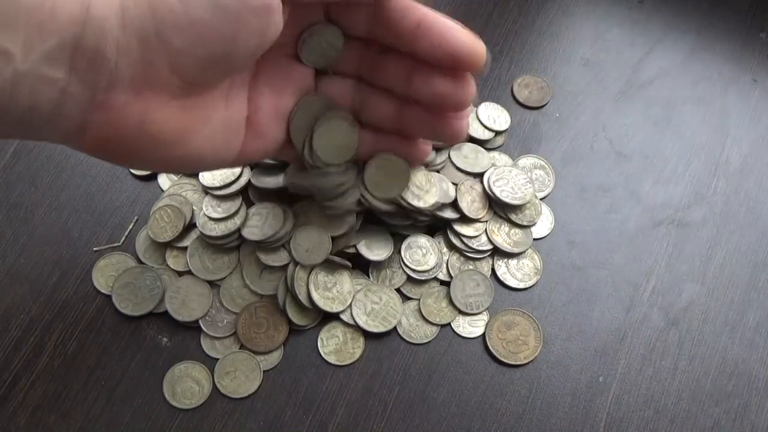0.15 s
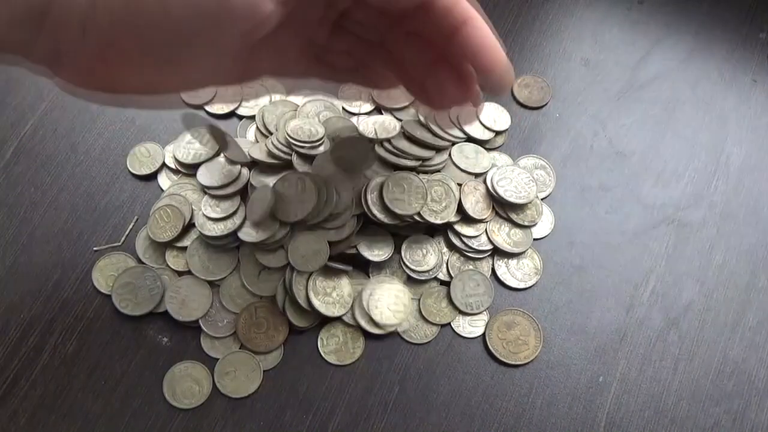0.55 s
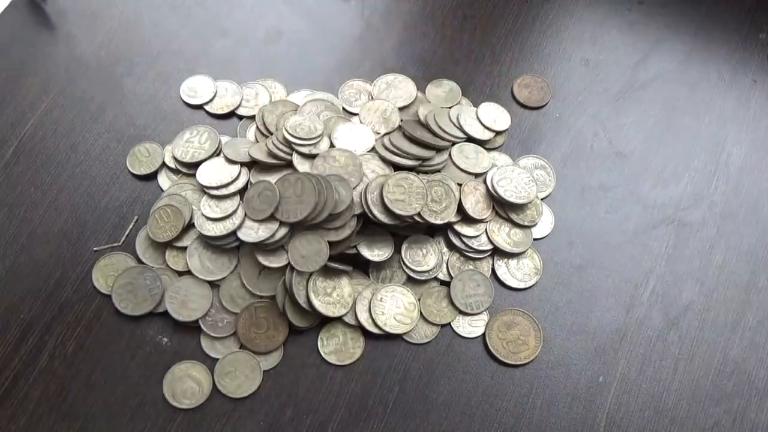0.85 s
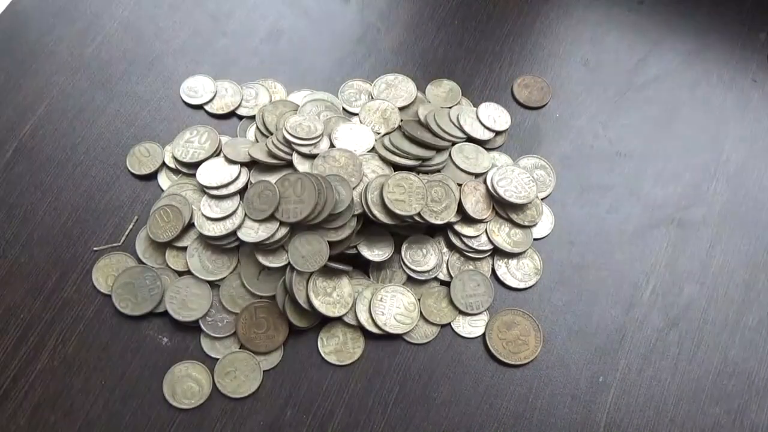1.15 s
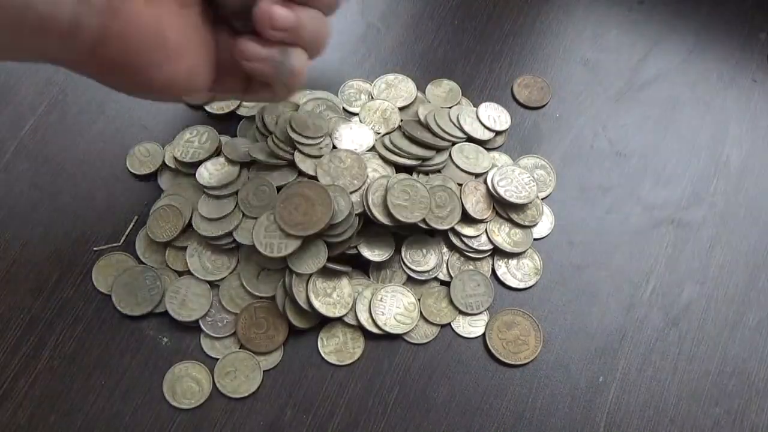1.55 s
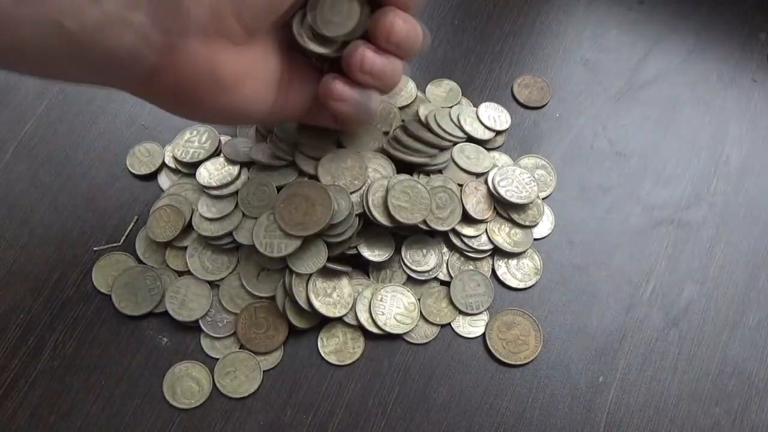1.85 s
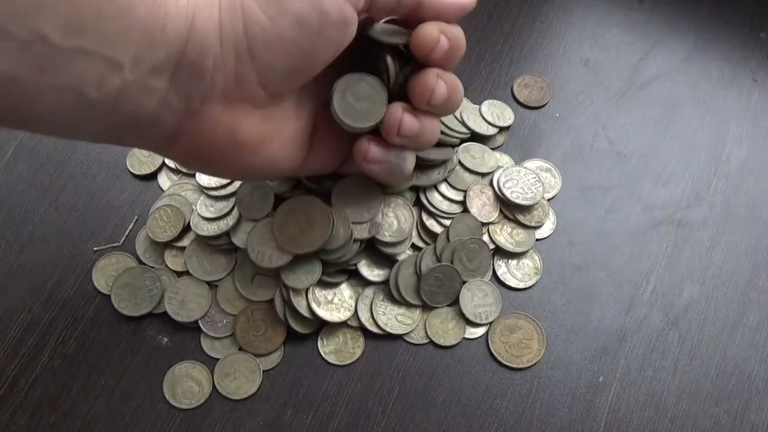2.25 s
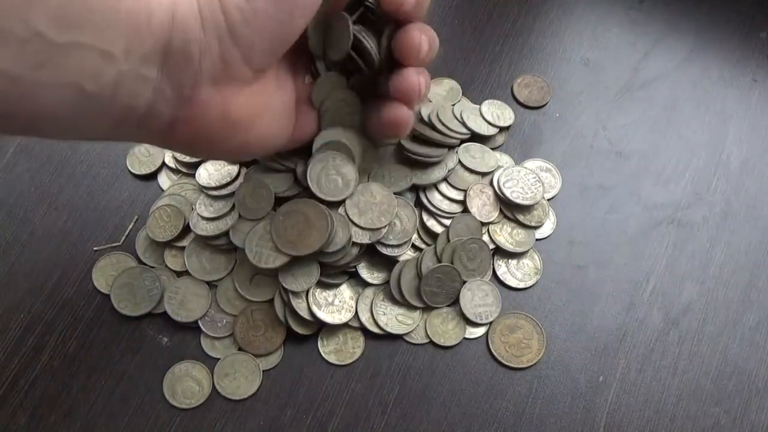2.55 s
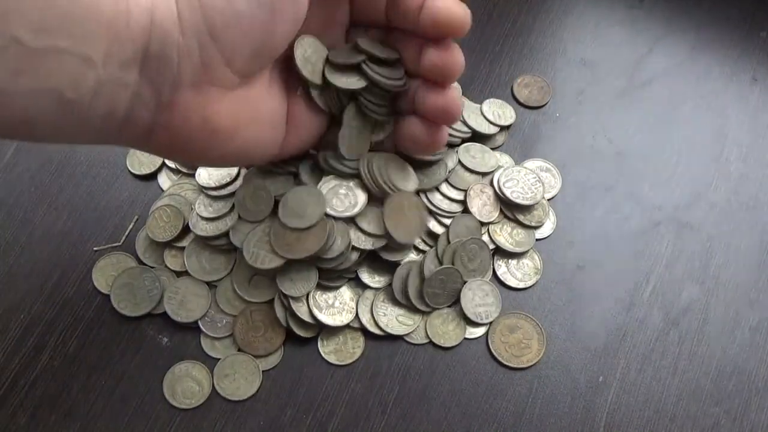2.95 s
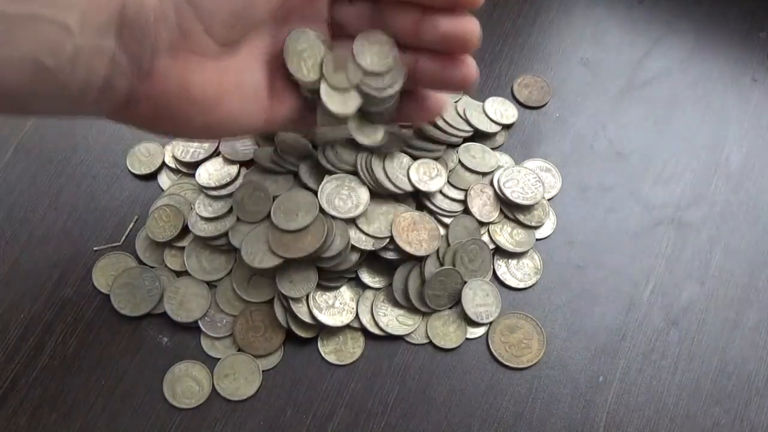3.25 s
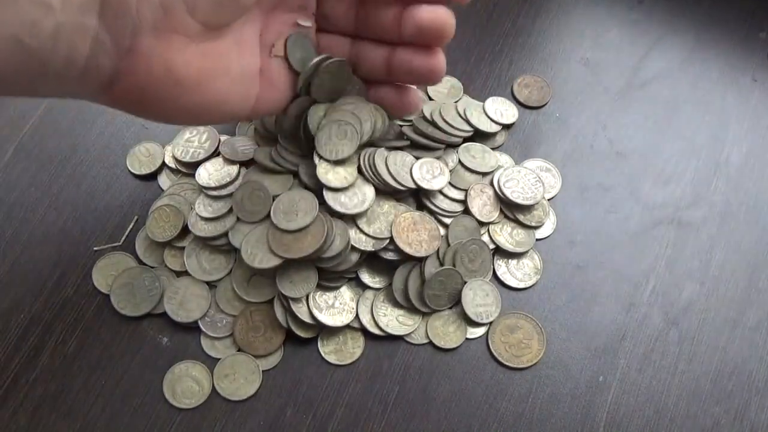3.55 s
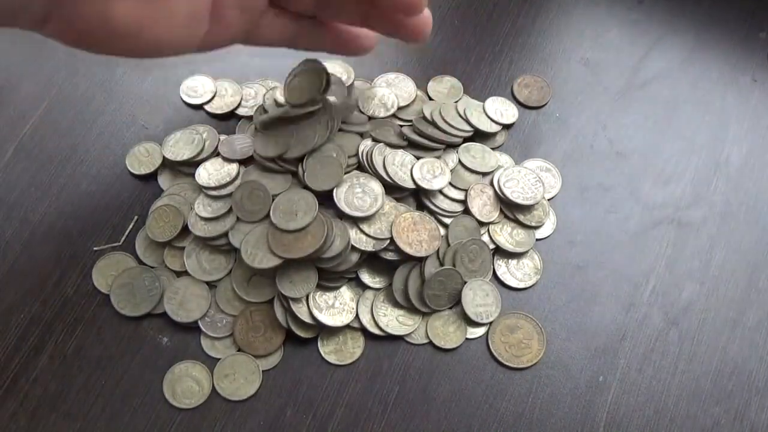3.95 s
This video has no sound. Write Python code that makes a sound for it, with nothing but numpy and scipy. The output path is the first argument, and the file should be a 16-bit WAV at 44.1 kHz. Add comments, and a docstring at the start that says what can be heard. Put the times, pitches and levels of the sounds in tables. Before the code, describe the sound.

Heard close up in a small, quiet room, a handful of coins jingles onto a coin pile, knocking lightly on the wooden table beneath. A loose coin skips away across the wood, an arm swishes, something bumps dully and one late coin lands. Then coins shift in the hand and spill again in several dense, clinking pours over faint room air and hum.

```python
"""Coins slide from a hand onto a heap of coins on a wooden table, close by, with a dull bump.
Each contact clicks, rings a coin and knocks the table. A stray coin bounces and rolls away,
the arm swishes, a late coin slaps on top; then coins shift in the hand and more handfuls pour.
A small room answers; room air and a faint hum lie under it all."""
import sys
import numpy as np
from scipy import signal
from scipy.fft import rfft, irfft, next_fast_len
from scipy.io import wavfile
from scipy.ndimage import uniform_filter1d, minimum_filter1d

SR = 44100
rng = np.random.default_rng(int(sys.argv[2]) if len(sys.argv) > 2 else 0)


def wav_record(signal):
    """Record a signal, one row per channel, as 16-bit PCM in the file named by sys.argv[1]."""
    frames = np.transpose(np.atleast_2d(signal))
    bounded = np.clip(frames, -1, 1)
    # unit amplitude maps onto the largest positive 16-bit level
    quanta = np.round(bounded * 32767).astype(np.int16)
    wavfile.write(sys.argv[1], SR, quanta)


N = 180369
BLOW_TIME_S = np.arange(SR // 8) / SR

# batches leaving the hand (start [s], rise [s], hold [s], fall [s], jingle [dB], clatter [dB])
POURS = [(0, 0.0017, 0.013, .1, -36.5, -39), (0.085, 0.075, 0.006, 0.13, -37, -35.5),
         (0.253, 0.0066, 0.09, 0.13, -27.5, -35.5), (0.34, 0.087, 0.18, 0.12, -22.5, -29.5),
         (1.689, .012, 0.044, 0.12, -35.5, -37.5), (1.845, 0.16, .06, 0.069, -25, -25),
         (2.145, 0.027, 0.024, 0.081, -35, -35), (2.285, .015, 0.056, 0.37, -31.5, -54),
         (2.375, 0.052, 0.014, 0.26, -21, -31), (2.58, 0.013, 0.019, 0.3, -34.5, -33),
         (2.72, 0.042, 0.14, 0.11, -21.5, -40.5), (2.911, 0.012, 0.036, 0.06, -21, -29),
         (3.128, 0.01, 0.0049, 0.07, -33, -41), (3.182, 0.13, .035, 0.082, -18, -33.5),
         (3.517, 0.014, .015, 0.05, -31, -27), (3.574, 0.025, 0.029, .22, -18.5, -29),
         (3.756, 0.081, 0.13, 0.28, -23.5, -30.5), (3.978, 0.011, 0.015, 0.032, -31, -25.5),
         (4.048, 0.013, .045, .07, -23.5, -27)]
# dull bumps (time [s], level [dB], resonance [Hz])
BUMPS = [(0.003, -21, 466), (0.017, -27.5, 414), (0.02, -34, 130), (0.454, -33, 190), (0.950, -7, 1170),
         (0.957, -28, 150), (2.931, -37.5, 189)]
# distinct landings (time [s], level [dB], knock offset [dB])
LANDINGS = [(.0363, -23, -4), (0.0977, -27.5, -0.5), (0.1432, -20.5, -23), (0.176, -14, -19),
            (0.2102, -20.5, -26), (0.2669, -11, -6), (0.3015, -7.5, -27), (0.3275, -14, -4),
            (.39, -13.5, -24), (0.4067, -9, -21), (0.4496, -9, -23), (0.5134, -6, -12), (0.555, -5.5, -11),
            (0.591, -8.5, -15.5), (1.4447, -30.5, -14.5), (1.521, -26.5, -15), (1.7246, -21, -13),
            (1.8175, -25, -1.5), (1.8795, -16, -6.5), (1.9025, -16, -8), (1.973, -9, -13),
            (2.013, -0.5, -27), (2.0281, 6, -19.5), (2.0608, -4, -19), (2.1069, -2, -11.5),
            (2.1628, -15.5, -4), (2.18, -11.5, -5.5), (2.2014, -15.5, -3.5), (2.2862, -16, -38),
            (2.3045, -8, -50), (2.3352, -11.5, -37), (2.4396, -8, -23), (2.518, -11, -11),
            (2.602, -4, -11.5), (2.6549, -9.5, -9.5), (2.6974, -16, -26), (2.711, -11.5, -7),
            (2.754, -7, -26), (2.7662, 1.5, -30), (2.8095, -6.5, -15.5), (2.848, -4.5, -29),
            (2.9093, -14, -24.5), (2.9322, -3, -13), (3.014, -22.5, -17), (3.137, -16, -27),
            (3.188, -12, -50), (3.2352, -9, -42), (3.3148, -10.5, -16), (3.3268, -8.5, -13),
            (3.3455, -11, -11), (3.384, -20, -11), (3.4215, -12, -25), (3.5311, -13.5, -6.5),
            (3.5381, -11.5, -3), (3.5793, -7, -36), (3.6062, -9.5, -12), (3.644, -10, -6.5),
            (3.7221, -7.5, -4.5), (3.792, -13, -3.5), (3.8446, -1.5, -9), (3.875, -12.5, -9),
            (3.907, -5, -18), (3.9459, -8, -12.5), (3.9809, -7, -4.5), (4.0078, -13, -6),
            (4.0463, -8.5, -7.5), (4.0534, -7, -14), (4.0824, -2, -11)]
# flat landings on a stack (time [s], level [dB], pitch [Hz])
FLAT_LANDINGS = [(.1633, -14, 2930), (2.0273, -12, 2340), (2.0604, -3.5, 4810), (2.1076, -4, 4810),
                 (2.162, -14.5, 5070), (2.1804, -7, 2880), (2.2008, -8, 2765), (2.9312, -10, 2520),
                 (3.327, -13, 2900), (3.9804, -6, 3210)]
# coins ringing freely (time [s], pitch [Hz], level [dB])
REBOUNDS = [(.294, 8020, -28.5), (0.392, 8130, -24.5), (.468, 9450, -23.5), (.598, 8980, -16.5),
            (.703, 9216, -23), (2.306, 10260, -28), (2.305, 9900, -22.5), (2.334, 7810, -21),
            (2.518, 9730, -23), (2.758, 9720, -28), (2.784, 6600, -27), (2.863, 10950, -20.5),
            (3.578, 7700, -28), (3.667, 7780, -23), (3.874, 8000, -20), (3.916, 9150, -19.5)]
# arm swishes (start [s], rise [s], hold [s], fall [s], level [dB])
ARM_MOVES = [(0.781, 0.11, 0.12, 0.08, -31.5), (1.06, 0.088, 0.037, 0.16, -44.5),
             (1.362, .13, 0.064, 0.036, -48)]
# late coin's touchdowns (time [s], level [dB])
LATE_TOUCHES = [(1.2753, -23), (1.2857, -10.5), (1.2884, -10.5), (1.296, -25)]
# coins shifting in the hand (start [s], rise [s], hold [s], fall [s], level [dB])
HAND_SHIFTS = [(1.695, .008, 0.2, .15, -43.5), (2.376, 0.057, 0.24, .12, -40.5),
               (3.136, .008, 0.011, 0.031, -36.5)]
# lowest bending mode per kind of coin (frequency [Hz])
COIN_MODES_HZ = [7700, 7800, 7930, 8120, 8840, 9010, 9060, 9172, 9500, 10000, 9820, 10240, 10500, 10790]
# table top modes (frequency [Hz], level [dB], t60 before damping [s])
TABLE_MODES = [(701, -18.5, 0.33), (801, -20, 0.3), (1100, -15.5, 0.19), (1360, -26, 0.08),
               (1569, 2.5, 0.063), (1597, 3.5, 0.061), (1600, -23.5, 0.043), (1790, -7, 0.074),
               (2097, -1.5, 0.039), (2134, -8, 0.17), (2306, 1.5, 0.089), (2620, -10, 0.066),
               (3070, -6, 0.086), (3180, -25, 0.029), (3345, -7, 0.073)]
# hum partials (frequency [Hz], level [dB])
HUM_TONES = [(118.4, -79.5), (199.2, -65.5)]
# room decay (frequency [Hz], t60 [s])
ROOM_DECAY = [(200, 0.44), (1500, 0.2), (5000, 0.21), (11000, 0.034)]
# metal on metal (frequency [Hz], level [dB])
CLICK_SPECTRUM = [(200, -51), (600, -26), (2000, -18), (3500, -10.5), (5000, -2), (6800, -1), (8000, -0.5),
                  (9700, 3.5), (11000, -1.5)]
# blow on the table (frequency [Hz], level [dB])
KNOCK_SPECTRUM = [(50, -50.5), (175, -23.5), (300, -27), (440, -12.5), (780, -3), (1150, -1.5), (1500, 3.5),
                  (1900, -3), (2800, -0.5), (5000, -10.5), (9000, -35.5)]
# soft, heavy push (frequency [Hz], level [dB])
THUD_SPECTRUM = [(60, -19), (150, -10), (310, 3), (480, 1), (700, 0.5), (1250, -4), (2000, -2.5),
                 (3200, -14), (8000, -43)]
# crack of a rim (frequency [Hz], level [dB])
RIM_SPECTRUM = [(1200, -31), (3600, 8.5), (5000, 0), (7000, -8), (11000, -28)]
# rolling rim's weighting of the table's ring (frequency [Hz], gain [dB])
ROLL_SPECTRUM = [(400, -8), (730, 3), (1100, -2), (1650, 1.5), (2300, -7), (3200, 3), (4200, -17),
                 (9000, -25)]
# sleeve swish (frequency [Hz], level [dB])
SLEEVE_SPECTRUM = [(880, -17), (1500, -6), (3310, -7), (4400, -2.5), (5840, -7), (7370, 1), (11000, -9),
                   (14300, -48), (22000, -120)]
# coin face on the heap (frequency [Hz], level [dB])
SLAP_SPECTRUM = [(400, -32), (1500, -21), (2050, -3.5), (2450, -15), (3600, -12), (4500, 0.5), (5200, -9),
                 (7400, 3.5), (9500, -2.5), (11000, -14)]
# hollow of the hand (frequency [Hz], level [dB])
PALM_SPECTRUM = [(300, -29), (650, -11), (900, 0), (1150, -7), (1500, -1.5), (1900, -16), (3000, -20),
                 (9000, -45)]
# room air (frequency [Hz], level [dB])
AIR_SPECTRUM = [(30, 5), (70, -14.5), (140, -6), (190, -3.5), (330, -8), (540, 0), (1000, -4.5),
                (1500, -5.5), (2200, -7.5), (7300, -13), (11000, -20)]


def amp(db):
    """Decibels to gain."""
    return 10 ** (np.asarray(db) / 20)


def unit_rms(x):
    """Scale to rms 1."""
    return x / np.sqrt(np.mean(x ** 2) + 1e-20)


def unit_blow(x):
    """Scale to the energy of 1 ms at full level."""
    return x * np.sqrt(SR / 1000 / np.sum(x ** 2))


def sine(hz):
    """Sine, one blow long."""
    return np.sin(2 * np.pi * hz * BLOW_TIME_S)


def fade(t60_s):
    """Exponential decay, 60 dB in t60_s."""
    return np.exp(-np.log(1000) * BLOW_TIME_S / t60_s)


def swell(time_s, start_s, rise_s, hold_s, fall_s, depth_db=19):
    """Rise, hold and fall of a movement, linear in dB."""
    since_s = time_s - start_s
    below = np.maximum(0, 1 - since_s / rise_s) + np.maximum(0, (since_s - rise_s - hold_s) / fall_s)
    return amp(-depth_db * below)


def curve_at(points, hz):
    """Interpolate over log frequency."""
    knots_hz, values = np.transpose(points)
    return np.interp(np.log(hz + 1), np.log(knots_hz), values)


def colour(x, spectrum, size=2048):
    """Minimum-phase filter with the given spectrum."""
    cepstrum = irfft(np.log(amp(curve_at(spectrum, np.fft.rfftfreq(size, 1 / SR)))))
    cepstrum[1:size // 2] *= 2
    cepstrum[size // 2:] = 0
    kernel = irfft(np.exp(rfft(cepstrum)))
    return signal.fftconvolve(np.atleast_2d(x), kernel[None], axes=1)[:, :x.shape[-1]].reshape(x.shape)


def burst(spectrum, t60_s, tail_db, tail_t60_s):
    """Noise crack with a weaker tail."""
    envelope = fade(t60_s) + amp(tail_db) * fade(tail_t60_s)
    return unit_blow(colour(rng.standard_normal(len(BLOW_TIME_S)) * envelope, spectrum))


def stereo_noise(spectrum, width):
    """Coloured noise, part common, part separate per ear."""
    return unit_rms(colour(rng.standard_normal(N) + width * rng.standard_normal((2, N)), spectrum))


def add(out, time_s, x, spread_db=2.5):
    """Mix in at time_s, randomly panned."""
    start = max(0, round(time_s * SR))
    part = x[:max(0, N - start)]
    out[:, start:start + len(part)] += amp(rng.normal(0, spread_db) * np.array([[1], [-1]])) * part


def room_air():
    """Faint, steady air noise."""
    return amp(-53) * stereo_noise(AIR_SPECTRUM, width=0.51)


def hum():
    """Two steady low tones."""
    time_s = np.arange(N) / SR
    return sum(amp(db) * np.sqrt(2) * np.sin(2 * np.pi * (hz * time_s + rng.random()))
               for hz, db in HUM_TONES)


def coin_ring(hz, t60_s, twin_gain=0.41):
    """Struck disc: the bending mode splits into a beating pair."""
    split_hz = rng.uniform(30, 147)
    attack = 1 - np.exp(-BLOW_TIME_S / 0.0003)
    return (sine(hz) + twin_gain * sine(hz + split_hz)) * attack * fade(t60_s)


def clink(hz, ring_db, ring_t60_s):
    """Metal on metal: a click, and a ring choked by neighbouring coins."""
    click = burst(CLICK_SPECTRUM, t60_s=0.0056, tail_db=-16.5, tail_t60_s=0.078)
    worn_hz = hz * rng.normal(1, 0.0038)
    ring_gain = amp(ring_db + rng.normal(0, 1.8))
    ring = coin_ring(worn_hz, ring_t60_s * rng.lognormal(0, 0.15))
    return unit_blow(click + ring_gain * unit_blow(ring))


def table_ring(damping):
    """Mode strengths vary with the spot struck; the ring carries no bass below about 620 Hz."""
    modes = 0
    for hz, db, t60_s in TABLE_MODES:
        gain = amp(db + rng.normal(0, 3.2)) * rng.choice([-1, 1])
        modes += gain * sine(hz * rng.normal(1, 0.0019)) * fade(t60_s / damping)
    return unit_blow(signal.sosfilt(signal.butter(3, 620, "high", fs=SR, output="sos"), modes))


def knock():
    """The heap passes a blow to the table and damps it."""
    impact = burst(KNOCK_SPECTRUM, t60_s=0.019, tail_db=-7, tail_t60_s=0.1)
    return unit_blow(impact + amp(-7) * table_ring(damping=2.26))


def sliding_coins(rate_hz=560, scatter_db=5):
    """Coins slide over each other in many small contacts; overlapping pours add in power."""
    out = np.zeros((2, N))
    voices = [(clink(hz, ring_db=-5, ring_t60_s=0.055), knock()) for hz in np.repeat(COIN_MODES_HZ, 4)]
    count = int(N / SR * rate_hz)
    times_s = (np.arange(count) + rng.uniform(-0.92, 1, count)) / rate_hz
    sizes_db = scatter_db * np.clip(rng.standard_normal(count), -2, 2)
    sizes = unit_rms(amp(sizes_db)) * np.sqrt(1000 / rate_hz)
    flows = np.array([swell(times_s, *pour[:4]) for pour in POURS])
    jingle_db, clatter_db = np.transpose(POURS)[-2:]
    jingle = sizes * np.sqrt(amp(jingle_db) ** 2 @ flows ** 2)
    clatter = sizes * np.sqrt(amp(clatter_db) ** 2 @ flows ** 2)
    for k, voice in enumerate(rng.integers(len(voices), size=count)):
        metal, wood = voices[voice]
        add(out, times_s[k], jingle[k] * metal + clatter[k] * wood, spread_db=1.2)
    return out


def thuds():
    """Soft, heavy bumps boom around one broad resonance."""
    out = np.zeros((2, N))
    for time_s, db, hz in BUMPS:
        push = burst(THUD_SPECTRUM, t60_s=0.01, tail_db=-9, tail_t60_s=0.12)
        boom = signal.lfilter(*signal.iirpeak(hz, Q=2.2, fs=SR), push)
        add(out, time_s, amp(db - 1.5) * unit_blow(boom + amp(-14) * push), spread_db=0.5)
    return out


def chatter(x, gap_s=0.0013, loss_db=6, repeats=2):
    """A landing coin touches again in quick, weaker repeats."""
    delays_s = np.cumsum(rng.uniform(0.33, 1.6, repeats)) * gap_s
    return x + sum(amp(-loss_db * k) * np.pad(x, (int(delay_s * SR), 0))[:len(x)]
                   for k, delay_s in enumerate(delays_s, 1))


def landings(graze_lead_s=0.0035, graze_db=-12):
    """A rim grazes the heap, then the coin clinks and knocks."""
    out = np.zeros((2, N))
    for time_s, db, knock_db in LANDINGS:
        metal = amp(db - 3) * clink(rng.choice(COIN_MODES_HZ), ring_db=-7.5, ring_t60_s=0.032)
        add(out, time_s - graze_lead_s * rng.uniform(0.45, 1.5), amp(graze_db) * metal)
        wood = amp(db + knock_db - 0.5) * knock()
        add(out, time_s + 0.0005, chatter(metal + wood))
    return out


def clacks():
    """A coin landing flat is choked at once: a hard, pitched clack."""
    out = np.zeros((2, N))
    for time_s, db, hz in FLAT_LANDINGS:
        ring = unit_blow(coin_ring(hz, t60_s=0.023))
        crack = amp(-4.5) * burst(RIM_SPECTRUM, t60_s=0.017, tail_db=-5, tail_t60_s=0.06)
        add(out, time_s + 0.0005, amp(db - 6.5) * unit_blow(ring + crack))
    return out


def free_rings():
    """Coins rebounding into the air ring on briefly."""
    out = np.zeros((2, N))
    for time_s, hz, db in REBOUNDS:
        add(out, time_s, amp(db + 6) * coin_ring(hz, t60_s=0.094, twin_gain=0.14), spread_db=0)
    return out


def stray_coin(time_s=0.6208, flight_s=0.0412, flight_ratio=0.835, loss_db=0.7, rim_loss_db=1.7):
    """Five bounces on bare wood, ever faster and softer: the rim cracks, the table rings."""
    out = np.zeros((2, N))
    for k in range(5):
        wood = table_ring(damping=1.46)
        wood += amp(-5.5) * burst(KNOCK_SPECTRUM, t60_s=0.012, tail_db=-7, tail_t60_s=0.083)
        crack = burst(RIM_SPECTRUM, t60_s=0.0046, tail_db=-14, tail_t60_s=0.24)
        bounce = wood + amp(-3.5 - rim_loss_db * k) * crack
        add(out, time_s, amp(-6 - loss_db * k) * bounce, spread_db=1.2)
        time_s += flight_s * flight_ratio ** k
    return out


def rolling_coin(tip_s=0.76, tip_db=-12, start_s=0.7705, gap_s=0.0094, roll_db=-17.5):
    """The stray coin tips hard once, then wobbles on its rim; light ticks stir the table."""
    out = np.zeros((2, N))
    ticks = [(start_s + gap_s * (k + rng.normal(0, 0.061)), roll_db + rng.normal(0, 1.2))
             for k in range(10)]
    for time_s, db in ticks + [(tip_s, tip_db)]:
        tick = table_ring(damping=3.8)
        tick += amp(-7.5) * burst(KNOCK_SPECTRUM, t60_s=0.0055, tail_db=-14, tail_t60_s=0.12)
        add(out, time_s, amp(db) * unit_blow(colour(tick, ROLL_SPECTRUM)))
    return out


def sleeve_swish():
    """Soft noise swells as the arm moves."""
    motion = sum(amp(db) * swell(np.arange(N) / SR, *shape) for *shape, db in ARM_MOVES)
    return motion * stereo_noise(SLEEVE_SPECTRUM, width=0.55)


def late_coin():
    """One coin drops from higher up and slaps the heap, edge first, then flat."""
    out = np.zeros((2, N))
    for time_s, db in LATE_TOUCHES:
        slap = burst(SLAP_SPECTRUM, t60_s=0.022, tail_db=-16, tail_t60_s=0.18)
        add(out, time_s, amp(db - 2.5) * slap, spread_db=3)
    return out


def cupped_hand(rate_hz=300, scatter_db=4):
    """Jostling coins tick dully and ring the hollow of the hand."""
    contacts = rng.random(N) < rate_hz / SR
    ticks = contacts * amp(scatter_db * rng.standard_normal(N)) * rng.choice([-1, 1], N)
    motion = sum(amp(db) * swell(np.arange(N) / SR, *shape) for *shape, db in HAND_SHIFTS)
    return motion * unit_rms(colour(ticks, PALM_SPECTRUM))


def room(x):
    """Diffuse tail per ear, with frequency-dependent decay."""
    hz, time_s, noise = signal.stft(rng.standard_normal((2, SR // 2)), SR, nperseg=256)
    decay = amp(-60 * time_s / curve_at(ROOM_DECAY, hz)[:, None])
    tail = signal.istft(noise * decay, SR, nperseg=256)[1]
    tail = np.pad(tail / np.linalg.norm(tail[0]), ((0, 0), (SR // 200, 0)))  # 5 ms pre-delay
    return signal.fftconvolve(x.mean(0)[None], tail, axes=1)[:, :N]


def scene():
    """Close, fairly dry coins over a quiet background, slightly left."""
    coins = landings() + clacks() + sliding_coins() + free_rings() + cupped_hand()
    near = coins + stray_coin() + rolling_coin() + thuds()
    late = late_coin()
    reverb = room(amp(-14.5) * near + amp(-16) * late)
    background = hum() + sleeve_swish() + room_air()
    return (near + late + reverb + background) * amp([[0.3], [-0.3]])


def record(dry, ceiling=0.77, window=131, low_hz=85, top_hz=11180):
    """Fast peak limiter, bass cut, steep low-pass."""
    gain = np.minimum(1, ceiling / (np.abs(dry).max(0) + 1e-9))
    limited = dry * uniform_filter1d(minimum_filter1d(gain, window), window)
    thinned = signal.sosfilt(signal.butter(2, low_hz, "high", fs=SR, output="sos"), limited)
    size = next_fast_len(N + SR // 4)
    hz = np.fft.rfftfreq(size, 1 / SR)
    return irfft(rfft(thinned, size) / np.sqrt(1 + (hz / top_hz) ** 200), size)[:, :N]


dry = scene()
out = record(dry)
wav_record(out)
```